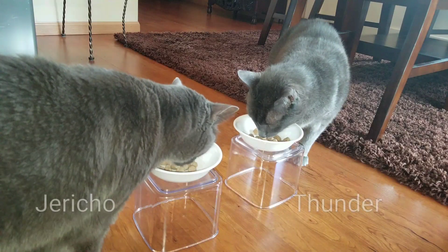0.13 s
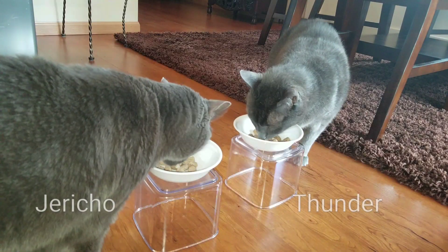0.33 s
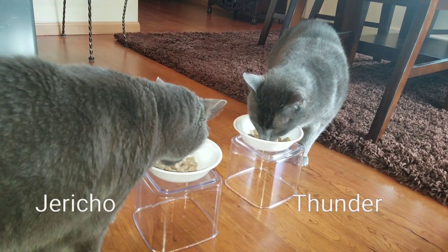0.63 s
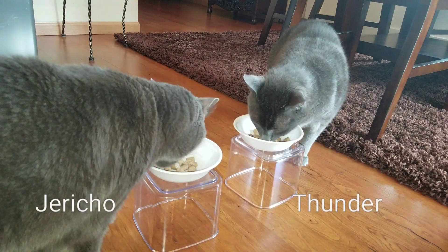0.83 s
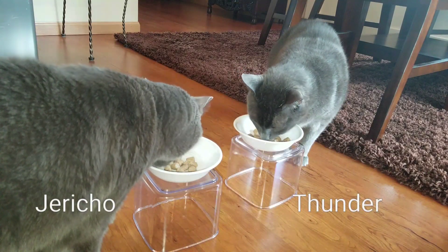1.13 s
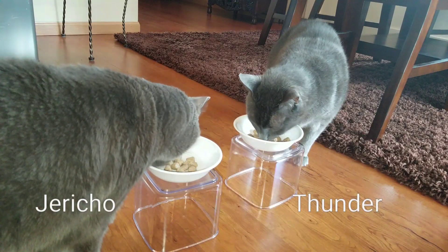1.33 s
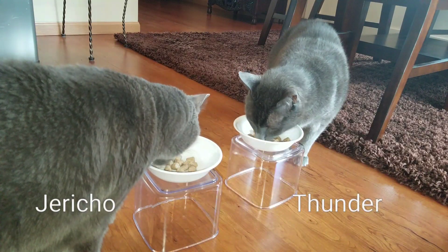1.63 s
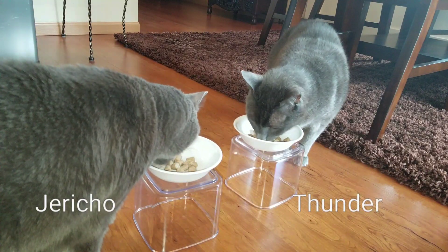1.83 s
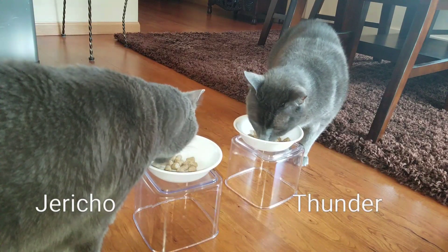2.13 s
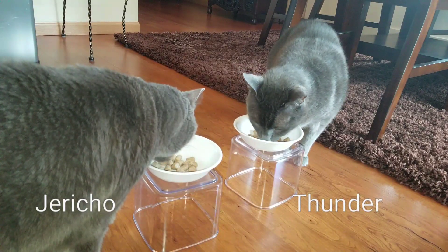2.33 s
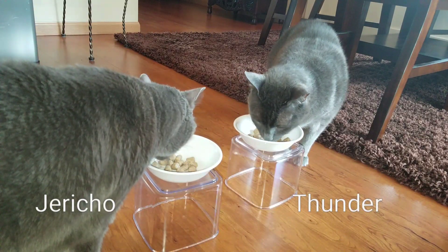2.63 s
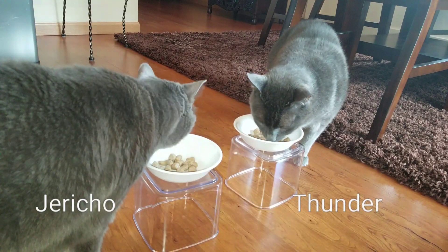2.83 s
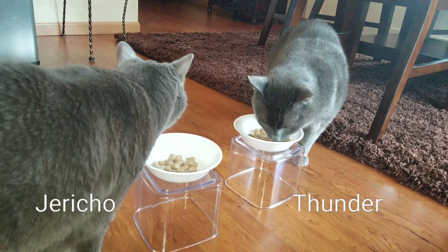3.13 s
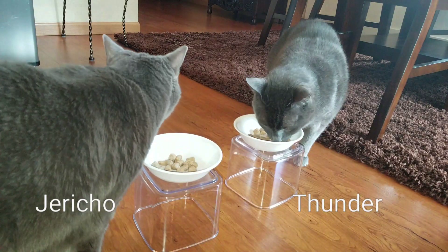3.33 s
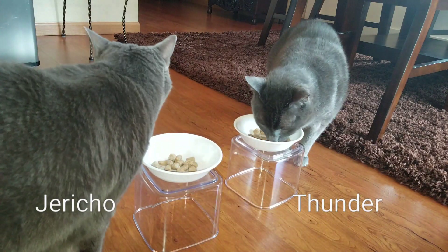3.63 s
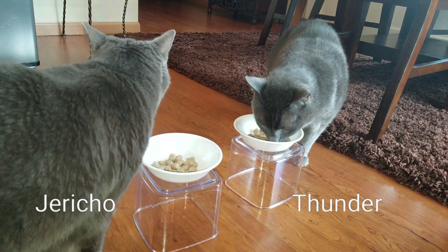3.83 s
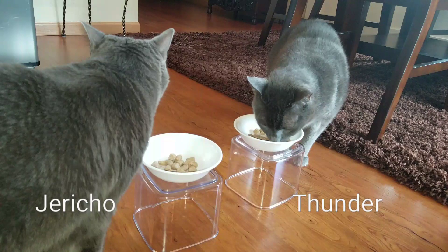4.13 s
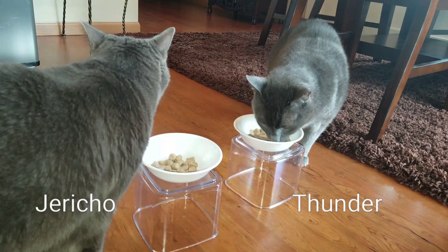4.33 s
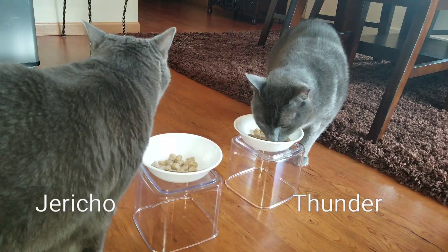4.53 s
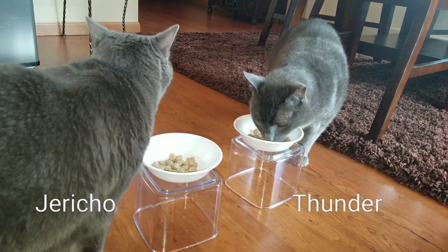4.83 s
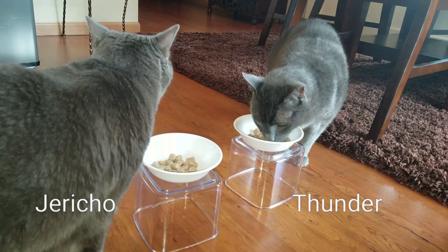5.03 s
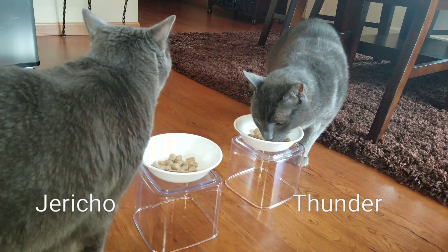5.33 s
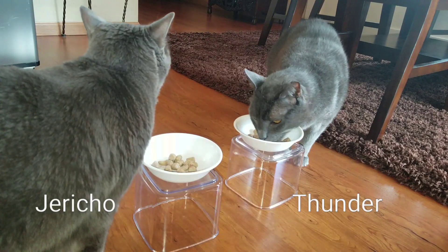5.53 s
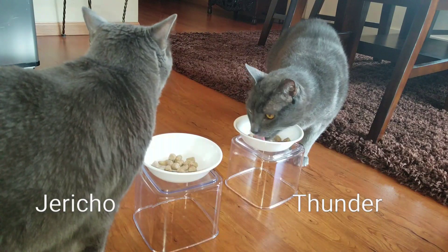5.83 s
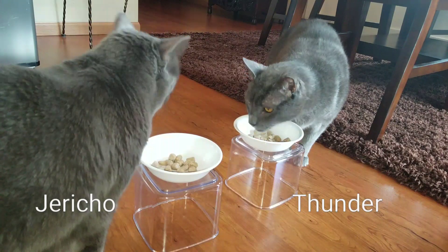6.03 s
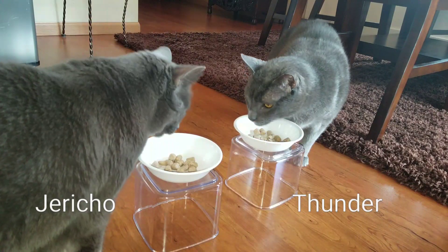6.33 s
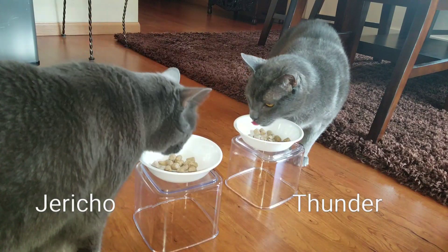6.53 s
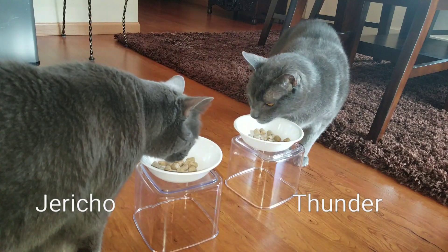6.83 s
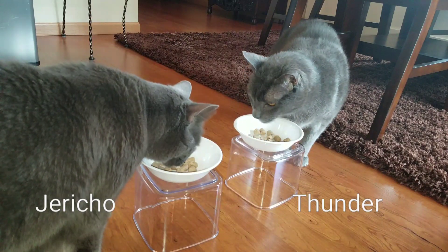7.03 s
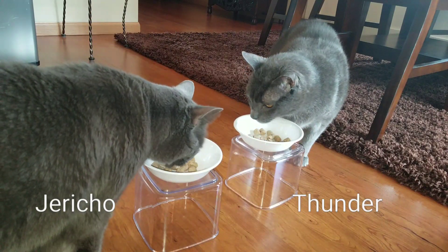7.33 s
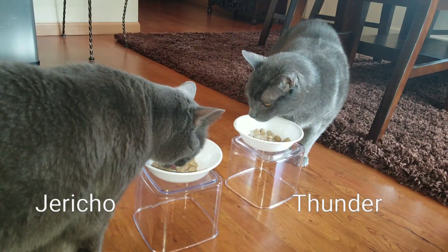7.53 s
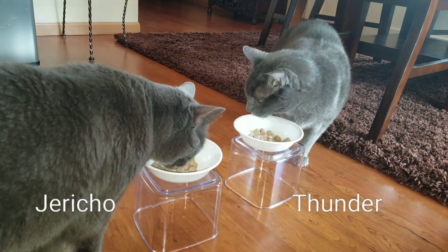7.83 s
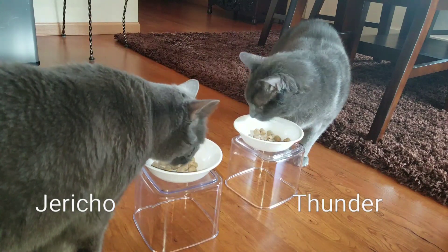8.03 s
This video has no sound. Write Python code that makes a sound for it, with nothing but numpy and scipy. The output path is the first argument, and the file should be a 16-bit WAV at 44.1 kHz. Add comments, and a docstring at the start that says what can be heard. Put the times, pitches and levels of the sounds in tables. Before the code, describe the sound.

In a quiet home with a wooden floor, a constant low hum and soft rumble lie under close wet eating sounds. Smacks come in a quick early cluster, thin out, then return irregularly, with the sharpest clicks late on. A gentle tick-tock sounds across the room beside a barely audible second clock. Short room reflections, light microphone hiss.

```python
"""Two cats eating beside two clocks

Two cats lap and chew soft food from bowls on a wooden floor, close to a two-port microphone: wet
seals pop as damped resonances and bursting films crackle. A pendulum clock rings its case modes in a
tick-tock across the room, and a faint wall clock rattles through one step a second. Sines make the mains
hum and the whine of distant motors; coloured noise makes the room rumble and microphone hiss."""
import sys
import numpy as np
from scipy import signal
from scipy.fft import rfft, irfft
from scipy.io import wavfile
from scipy.ndimage import uniform_filter1d

SR = 44100
rng = np.random.default_rng(int(sys.argv[2]) if len(sys.argv) > 2 else 0)


def master(y):
    """Save y as 16-bit WAV."""
    cut = np.clip(np.atleast_2d(y).T, -1, 1)
    pcm = np.round(cut * 32767)  # scale
    wavfile.write(sys.argv[1], SR, pcm.astype(np.int16))


N = 361179  # samples
PORT_LAG = 6  # samples by which sound reaches the right port later


def gain_of(db):
    """Level law: twenty decibels are a factor of ten in amplitude."""
    return 10 ** (np.asarray(db) / 20)


def evened(x):
    """Power normalisation: scales a signal to rms 1."""
    return x / np.sqrt(np.mean(x ** 2) + 1e-20)


def read(points, hz):
    """Logarithmic pitch scale: interpolates a table's values along log frequency."""
    f, value = np.transpose(points)
    return np.interp(np.log(hz + 1), np.log(f + 1), value)


def add(mix, s, sound):
    """Superposition: adds a sound into the mix from time s in seconds."""
    part = mix[..., max(round(s * SR), 0):][..., :sound.shape[-1]]
    part += sound[..., :part.shape[-1]]


CONTACT_CYCLES = 1.2  # cycles over which a struck mode swells


def ring(hz, t60, db, size):
    """Modal synthesis: a struck body sounds as a sum of decaying sines with random phases."""
    t = np.arange(size)[:, None] / SR
    hz = np.asarray(hz)
    turns = t * hz + rng.random(len(hz))
    decay = gain_of(db - 60 * t / t60)
    swell = np.tanh(t * hz / CONTACT_CYCLES)
    return (decay * swell * np.sin(2 * np.pi * turns)).sum(1)


# Decay of the room. Each row: frequency in Hz, time to fall 60 dB in seconds.
ROOM_DECAY = [(500, .3), (1000, .2), (2200, .24), (2700, .3), (4000, .18), (10000, .15)]


def room(x, gap_ms, wet_db):
    """Reverberation: direct sound at both ports, then sparse echoes whose bands decay at their own rates."""
    spacing = 20  # samples, one echo falls at random within each
    taps = np.zeros((2, SR // 2))
    at = np.arange(0, SR // 2 - spacing, spacing)
    places = at + rng.integers(0, spacing, (2, len(at)))
    signs = rng.choice([-1., 1.], (2, len(at)))
    np.put_along_axis(taps, places, signs, 1)
    hz, t, z = signal.stft(taps, SR, nperseg=128)
    decay = gain_of(-60 * t / read(ROOM_DECAY, hz)[:, None])
    tail = signal.istft(z * decay, SR, nperseg=128)[1]
    tail = tail / np.linalg.norm(tail[0])
    tail = np.pad(tail, ((0, 0), (round(abs(gap_ms) * SR / 1000), 0)))
    x = np.broadcast_to(x, (2, N))
    direct = np.array([x[0], np.roll(x[1], PORT_LAG)])
    return direct + gain_of(wet_db) * signal.fftconvolve(x, tail, axes=1)[:, :N]


# Likeness of the two ports. Each row: frequency in Hz, left-right correlation before the caller's factor.
PORT_LIKENESS = [(60, .99), (180, .97), (300, .86), (630, .53), (1400, .02), (3000, -.05)]


def noise(spectrum, same, patchy_db, size=2048):
    """Partial coherence: the ports share part of a coloured noise whose bands drift in level."""
    hz = np.fft.rfftfreq(size, 1 / SR)
    a, b, c, d, patches = rng.standard_normal((4 * N // size + 5, len(hz), 5)).T
    patches = uniform_filter1d(patches, size=12, axis=0)
    patches = evened(uniform_filter1d(patches, size=6, axis=1))
    same = np.clip(same * read(PORT_LIKENESS, hz), -1, 1)[:, None]
    left = a + 1j * b
    right = same * left + np.sqrt(1 - same ** 2) * (c + 1j * d)
    z = np.array([left, right])
    z *= gain_of(read(spectrum, hz)[:, None] + patchy_db * patches)
    return evened(signal.istft(z, nperseg=size, noverlap=3 * size // 4)[1][:, :N])


# Colour of the house rumble. Each row: frequency in Hz, relative spectral density in dB.
RUMBLE_COLOUR = [(24, -29), (35, -11.5), (70, 0), (105, 0), (160, -2.5), (200, -6.5), (260, -8),
                 (500, -12.5), (660, -19.5), (820, -13), (930, -22), (1800, -28.5), (2500, -33.5),
                 (7000, -46.5)]
# Colour of the microphone hiss. Each row: frequency in Hz, relative spectral density in dB.
HISS_COLOUR = [(1000, 8), (6000, 2), (8300, -0.5), (9600, -12), (11500, 5), (14500, 5.5)]
RUMBLE_DB, HISS_DB = -50, -68.5  # rms


def rumble_and_hiss():
    """Stationary random noise: correlated house rumble and independent microphone hiss."""
    rumble = gain_of(RUMBLE_DB) * noise(RUMBLE_COLOUR, same=0.9, patchy_db=0.89)
    hiss = gain_of(HISS_DB) * noise(HISS_COLOUR, same=0, patchy_db=0.75)
    return rumble + hiss


FAN_HZ, FRIDGE_HZ, PUMP_HZ = 53.88, 58.92, 59.31  # shaft speeds
# Harmonics of the fan. Each row: multiple of the shaft speed, rms level in dB.
FAN_ORDERS = [(1, -62), (2, -67), (4, -68), (5, -75), (8, -70), (12, -85)]
# Harmonics of the fridge. Each row: multiple of the shaft speed, rms level in dB.
FRIDGE_ORDERS = [(1, -64), (2, -63), (3, -69), (4, -64), (7, -77), (20, -85), (25, -85), (26, -81),
                 (27, -90), (30, -90), (31, -82), (32, -82)]
# Harmonics of the pump. Each row: multiple of the shaft speed, rms level in dB.
PUMP_ORDERS = [(13, -75), (55, -92), (62, -94), (65, -94), (76, -92), (77, -88), (78, -96), (79, -99),
               (80, -92), (81, -96), (82, -97), (196, -101), (198, -101)]
# Mains hum and other steady tones. Each row: frequency in Hz, rms level in dB.
STEADY_TONES = [(119.97, -43), (37.9, -66), (65.8, -71), (101.1, -59), (125.4, -66), (138.8, -66),
                (160.6, -60), (167.3, -65), (209, -67), (227.7, -67), (281.7, -70), (321.2, -77),
                (401.6, -79), (502, -80), (5185.5, -90)]


def hum():
    """Harmonic series: motors sound at multiples of shaft speed, beside mains hum and other steady tones."""
    lines = list(STEADY_TONES)
    for shaft_hz, orders in ((FAN_HZ, FAN_ORDERS), (FRIDGE_HZ, FRIDGE_ORDERS), (PUMP_HZ, PUMP_ORDERS)):
        lines += [(shaft_hz * multiple, db) for multiple, db in orders]
    t = np.arange(N) / SR
    out = np.zeros((2, N))
    for (hz, db), start in zip(lines, rng.random(len(lines))):
        # the right port lags by its delay, at most a quarter turn
        lag = np.array([[0], [min(hz * PORT_LAG / SR, 1 / 4)]])
        out += np.sqrt(2) * gain_of(db) * np.sin(2 * np.pi * (hz * t + start - lag))
    return out


# Modes of the wall clock's plastic case. Each row: frequency in Hz, relative level in dB.
WALL_MODES = [(1150, 0), (1450, -4), (1750, -5), (2100, -8), (2420, -1), (2900, -10), (3400, -11),
              (4100, -14), (4800, -17), (5600, -19)]
WALL_T60 = .02  # s
FIRST_STEP_S, STEP_S = .487, 1.0  # peak of the first rattle, time between steps
STEP_DB = -60


def wall_clock():
    """Impact excitation: a stepping motor's gear slaps grow, then settle, ringing the plastic case."""
    ms = np.arange(-40, 30, 1000 / SR)
    swell = gain_of(np.where(ms < 0, 0.089 * ms, -.6 * ms))
    hz, mode_db = np.transpose(WALL_MODES)
    body = ring(hz, WALL_T60, mode_db, size=1500)
    out = np.zeros(N)
    for s in np.arange(FIRST_STEP_S, N / SR, STEP_S):
        slaps = swell * rng.standard_normal(len(ms))
        slaps *= rng.random(len(ms)) < 400 / SR  # about 400 slaps a second
        add(out, s + ms[0] / 1000, gain_of(STEP_DB) * np.convolve(slaps, body))
    return room(out, gap_ms=4.0, wet_db=-2.5)


# Blows within a beat: the pallet unlocks, the wheel lands and rebounds.
# Each row: time from the beat in ms, relative level on the tick in dB, on the tock in dB.
BLOWS = [(-2.6, -3, -12), (-0.4, 0, 0), (4.5, -3, -2), (13, -4, -2)]
# Modes of the wooden clock case, a list of frequencies in Hz.
CASE_HZ = [985, 1090, 1200, 1330, 1520, 1740, 1930, 2090, 2230, 2330, 2500, 2630, 2750, 2870, 3100, 3390,
           3530, 3640, 3740, 4200, 4750]
# Levels of those modes in dB, relative. The first row: on the tick; the second: on the tock.
CASE_DB = [
    [3, 1.5, -12, -8, -8, -8.5, -9, -5, -6.5, -6, -8, -4, -1, -9, -9, -10.5, -6, -4.5, -9.5, -18, -18.5],
    [-7.5, -6.5, -4, -7, -11.5, -10, -12, -4, -2.5, -4.5, -9.5, -2.5, -2.6, -8.5, -12, -12, -7, -7.5, -12.5,
     -14, -20],
]
CASE_T60 = .035  # s, thin wood damps every mode quickly
FIRST_TICK_S, SWING_S = .5068, 1.11035  # the escapement strikes its two pallets in turn
TOCK_AFTER_S, TOCK_DRIFT_S = .4685, .0018  # tock follows tick by this, a little later each swing
TICK_DB, TOCK_DB, FADE_DB_PER_S = -49, -47.5, -0.45  # levels at time zero, and their change
BLOW_JITTER_MS = .6  # full width


def pendulum():
    """Modal excitation: steel pallet blows ring the wooden case, its modes weighted by tick or tock."""
    t = np.arange(3000) / SR
    out = np.zeros(N)
    steel = np.diff(rng.standard_normal(len(t) + 2), 2) * gain_of(-15 - 60 * t / .015)
    ticks = np.arange(FIRST_TICK_S, N / SR, SWING_S)
    tocks = ticks + TOCK_AFTER_S + TOCK_DRIFT_S * np.arange(len(ticks))
    for k, (times, db) in enumerate([(ticks, TICK_DB), (tocks, TOCK_DB)]):
        for ms, *blow_db in BLOWS:
            body = steel + ring(CASE_HZ, CASE_T60, np.array(CASE_DB[k]), size=len(t))
            for s, late in zip(times, rng.random(len(times)) - .5):
                level = gain_of(db + FADE_DB_PER_S * s + blow_db[k])
                add(out, s + (ms + BLOW_JITTER_MS * late) / 1000, level * body)
    return room(out, gap_ms=1.474, wet_db=0.34)


# Colour of the wet crackle from mouth and bowl. Each row: frequency in Hz, relative level in dB.
WET_COLOUR = [(700, -30), (1400, -2), (3000, 0), (4500, -4), (6500, -10), (10000, -13), (14000, -14)]


def crackle(size, tilt_db):
    """Shot noise: tiny films burst at random in uneven sizes, coloured by the mouth and bowl."""
    sizes = gain_of(3.5 * np.minimum(rng.exponential(1, size), 4))
    signs = rng.choice([-1, 1], size)
    bursts = sizes * signs * (rng.random(size) < 1000 / SR)  # about 1000 a second
    hz = np.fft.rfftfreq(size, 1 / SR)
    colour_db = read(WET_COLOUR, hz) + tilt_db * np.log2((hz + 1) / 3000)
    return evened(irfft(rfft(bursts) * gain_of(colour_db), size))


# Bouts of wet crackle as tongues work the food.
# Each row: middle in seconds, length in seconds, level in dB, treble tilt in dB per octave.
LAPS = [(0.039, 0.15, -61, 9.5), (0.221, 0.039, -59.5, -3), (1.02, .07, -68, 4), (1.845, 0.067, -63, -8),
        (2.294, .08, -67.5, -2), (3.246, 0.18, -66, -5), (3.488, 0.043, -68, 3), (3.858, 0.12, -62, -5.5),
        (4.167, 0.013, -57, 0), (4.286, 0.072, -64.5, -3), (4.482, 0.068, -64, -0.5),
        (4.822, 0.074, -67, -1.5), (5.469, 0.14, -65, -1), (5.813, .03, -66.5, -1),
        (7.822, 0.073, -61.5, -5)]
FAINT_LAPS_DB = -82.5
SMACK_LAP_S, SMACK_LAP_DB = 0.046, -73  # the short crackle that follows every listed smack


def lapping():
    """Amplitude modulation: Gaussian envelopes shape bouts of crackle over a faint steady one."""
    out = gain_of(FAINT_LAPS_DB) * crackle(N, 0)
    after_smacks = [(s + SMACK_LAP_S / 2, SMACK_LAP_S, SMACK_LAP_DB, 0) for s, *_ in SMACKS]
    t = np.arange(-4096, 4096) / SR
    for s, length, db, tilt_db in list(LAPS) + after_smacks:
        bout = crackle(len(t), tilt_db) * np.exp(-8 * (t / length) ** 2)
        first = max(round(-(s + t[0]) * SR), 0)  # skips what falls before time zero
        add(out, s + t[first], gain_of(db) * bout[first:])
    return room(out, gap_ms=3.0, wet_db=-2.5)


# Smacks of tongue and teeth. Each row: start in seconds, mouth ring level in dB, mouth ring frequency
# in Hz, treble snap level before its band filter in dB, left minus right in dB.
SMACKS = [(0.105, -50, 1700, -52, 0), (0.2198, -49, 1540, -55, 11), (0.314, -51, 1750, -53, 4),
          (0.4205, -45.5, 1550, -65, 1), (0.6983, -49, 1670, -56, -2), (1.461, -55, 1440, -56, 0),
          (1.5327, -48, 1450, -58, 3), (1.8284, -48, 1840, -58, 0), (2.4342, -45, 1820, -69, 0),
          (2.458, -50, 1650, -56, 0), (3.1025, -44, 2020, -67, 1), (3.3594, -60, 1530, -54, -3),
          (3.7243, -45, 1450, -60, -4), (3.8, -57, 1890, -55, 0), (4.1688, -45, 1950, -65, -6),
          (4.2736, -43, 2140, -63, 0), (4.473, -48, 1820, -63, 2), (5.1277, -47, 2110, -61, 0),
          (5.3894, -46, 1690, -64, -5), (5.7635, -40.5, 2200, -56, 0), (6.294, -44, 1900, -66, -4),
          (6.312, -46, 2090, -58, -2), (6.5086, -42.5, 1390, -59.5, -2), (7.3393, -38, 2820, -67, 8),
          (7.3542, -49, 3060, -62.5, 14), (7.3606, -41.5, 1580, -57, -4), (7.599, -42, 1540, -59, -2),
          (7.807, -50, 1870, -61, 0), (8.0293, -53, 1540, -51, -3), (8.071, -47, 1520, -68, -6)]
FAINT_SMACKS_PER_S = 2
FAINT_RING_DB, FAINT_SNAP_DB, FAINT_SPREAD_DB = -51, -62, 5  # spread is either way
FAINT_HZ = 1600  # middle of the faint rings' range


def smacks():
    """Damped resonance: a breaking wet seal rings the mouth and hisses briefly; faint ones fall at random."""
    t = np.arange(600) / SR
    out = np.zeros((2, N))
    snap_band = signal.butter(2, [2000, 10000], "bandpass", fs=SR)
    when, size, pitch, side = rng.random((round(FAINT_SMACKS_PER_S * N / SR), 4)).T
    more_db = FAINT_SPREAD_DB * (2 * size - 1)
    faint_hz = FAINT_HZ * (.85 + .3 * pitch)
    faint_pan_db = 6.0 * (side - .5)
    faint = zip(when * N / SR, FAINT_RING_DB + more_db, faint_hz, FAINT_SNAP_DB + more_db, faint_pan_db)
    for s, ring_db, hz, snap_db, pan_db in list(SMACKS) + list(faint):
        ring_decay = gain_of(ring_db - 60 * t / (14 / hz))  # 60 dB in 14 cycles
        pop = np.sin(2 * np.pi * hz * t) * ring_decay * np.tanh(t * hz)
        hiss = signal.lfilter(*snap_band, rng.standard_normal(len(t)))
        snap = hiss * gain_of(snap_db - 60 * t / 0.011) * np.tanh(t / .0006)
        pan = gain_of(np.array([[.5], [-.5]]) * pan_db)
        add(out, s, pan * (pop + snap))
    return room(out, gap_ms=6.0, wet_db=-6.0)


def scene():
    """Superposition: the pressures of all sources add at the two ports."""
    return rumble_and_hiss() + hum() + wall_clock() + pendulum() + lapping() + smacks()


# Balance of the two ports. Each row: frequency in Hz, left minus right in dB.
PORT_TILT = [(30, -2.2), (130, -1.9), (300, -.6), (1000, 0), (4000, 1), (14500, 1.2)]
EDGE_HZ = 14560  # upper band limit


def record(dry):
    """Linear filtering: the ports differ slightly in response, then a low-pass limits the band."""
    tilt_db = read(PORT_TILT, np.fft.rfftfreq(N, 1 / SR)) * np.array([[.5], [-.5]])
    ports = irfft(rfft(dry) * gain_of(tilt_db), N)
    low_pass = signal.firwin(1023, EDGE_HZ, window=("kaiser", 9), fs=SR)
    return signal.oaconvolve(ports, low_pass[None], "same")


dry = scene()
out = record(dry)
master(out)
```